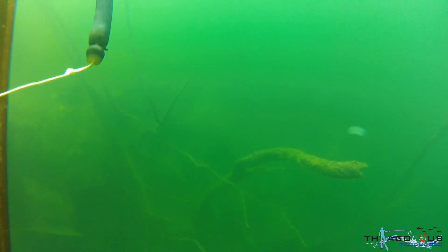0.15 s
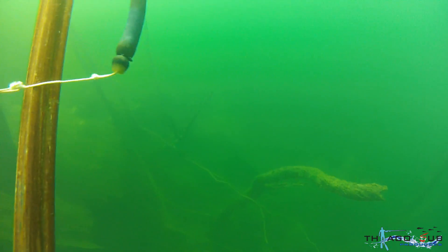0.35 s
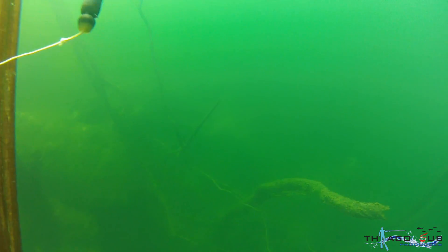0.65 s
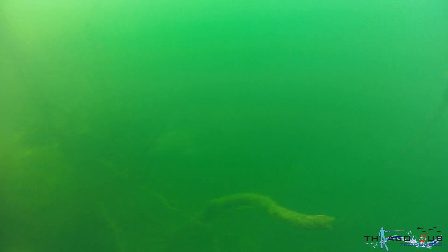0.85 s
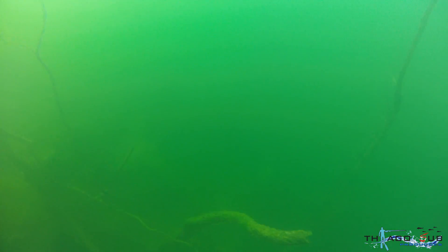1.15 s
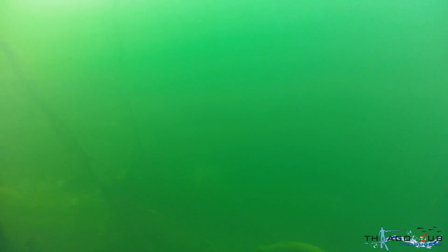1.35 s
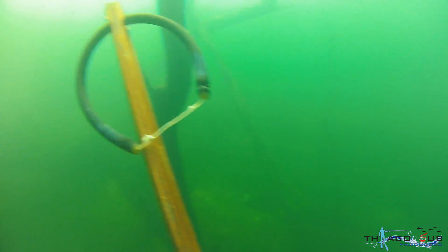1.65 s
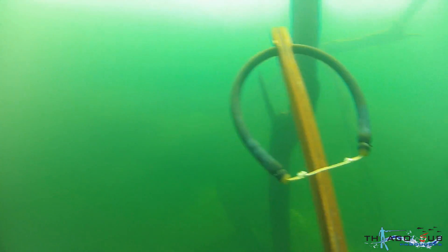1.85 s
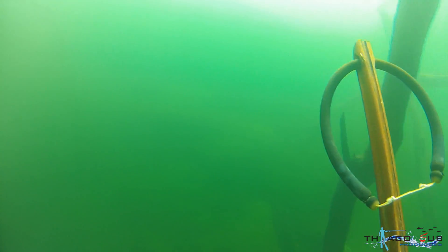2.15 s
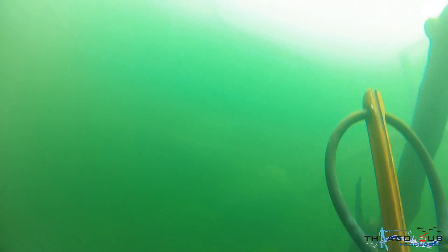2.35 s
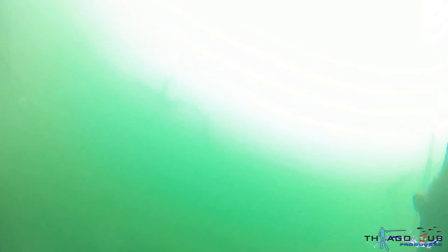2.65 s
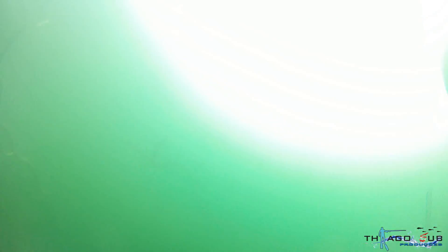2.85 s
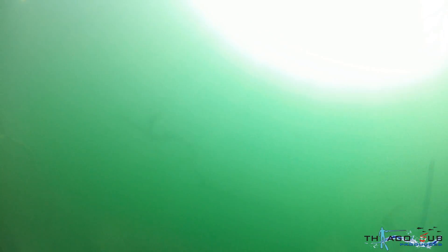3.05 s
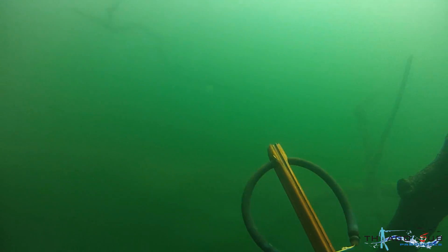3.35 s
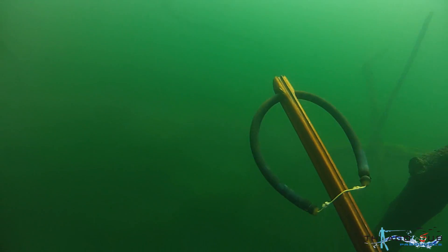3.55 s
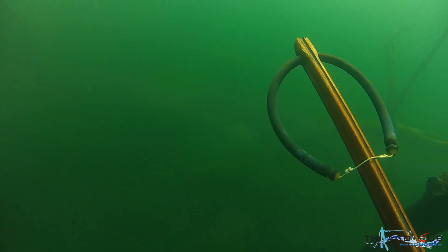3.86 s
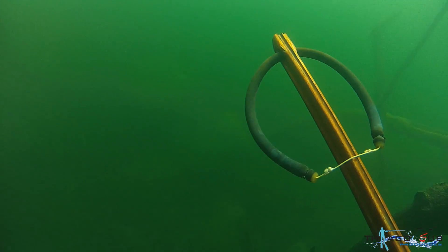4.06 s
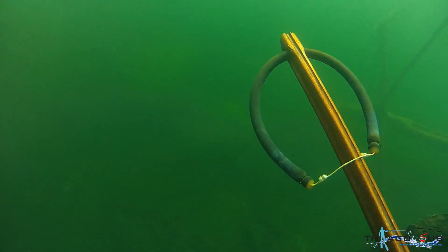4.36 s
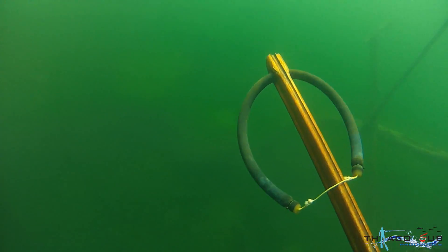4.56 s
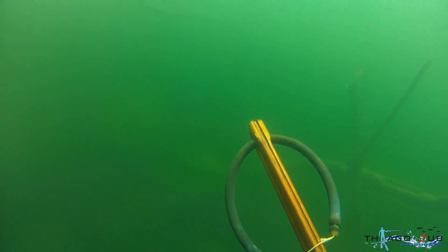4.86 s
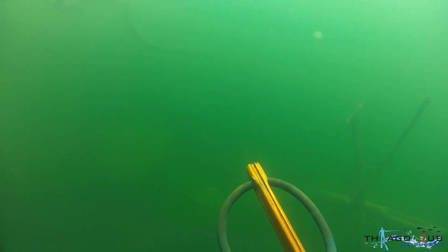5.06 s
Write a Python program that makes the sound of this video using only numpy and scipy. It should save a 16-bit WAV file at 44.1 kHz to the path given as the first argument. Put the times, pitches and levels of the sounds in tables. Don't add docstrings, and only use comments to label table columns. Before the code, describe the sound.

A housed camera moves underwater in low, muffled rumble and gurgle. Quick small gulps come first, with a few pings at half a second. From 1.2 to 1.8 seconds hard, dry snaps hit the shell. Sparse ticks and slow pressure pushes follow, then from about 4 seconds scraping, hollow knocks and bubbly glugs. Very close, dull, nearly mono, with a faint hiss.

```python
import sys
import numpy as np
from scipy import signal
from scipy.fft import rfft, irfft, next_fast_len
from scipy.io import wavfile
from scipy.ndimage import uniform_filter1d, map_coordinates

SR = 44100
rng = np.random.default_rng(int(sys.argv[2]) if len(sys.argv) > 2 else 0)


def log_audio(samples):
    frames = np.atleast_2d(samples).T
    limited = np.clip(frames, -1, 1)
    pcm = np.round(limited * 32767).astype(np.int16)
    wavfile.write(sys.argv[1], SR, pcm)


def ratio(d):
    e = np.asarray(d, float) / 20
    return 10 ** e


N = 230038
TIME = np.arange(N) / SR


def unit(x):
    return x / np.sqrt(np.mean(x ** 2) + 1e-20)


def along(points, hz):
    f, v = np.transpose(points)
    return np.interp(np.log(hz + 1), np.log(f + 1), v)


def level_curve(rows):
    s, db = np.transpose(rows)
    return np.interp(TIME, s, db)


def wobble(rate):
    knots = rng.standard_normal(int(N * rate / SR) + 4)
    return map_coordinates(knots, [np.arange(N) * rate / SR])


def filtered(x, response):
    m = next_fast_len(N + 8192)
    return irfft(rfft(x, m) * response(np.fft.rfftfreq(m, 1 / SR)), m)[..., :N]


def coloured(x, spectrum):
    return filtered(x, lambda hz: ratio(along(spectrum, hz)))


def rush(spectrum):
    return unit(coloured(rng.standard_normal(N), spectrum))


def super_gaussian(x, centre_hz, width_hz):
    return filtered(x, lambda hz: np.exp(-np.abs(2 * (hz - centre_hz) / width_hz) ** 4))


def add(track, s, sound):
    part = track[max(round(s * SR), 0):][:len(sound)]
    part += sound[:len(part)]


def swell(t, t60, rise_ms):
    rise = 1 - np.exp(-(1000 * t / np.abs(rise_ms)) ** 2)
    shape = rise * ratio(-60 * t / np.abs(t60))
    return shape / shape.max()


def window(s, length, edge):
    return np.clip(np.minimum(TIME - s, s + length - TIME) / edge, 0, 1)


# time in seconds, strength in dB.
FLOW_SPEED = [(0.11, -63), (0.29, -57), (0.88, -63), (1.16, -65.5), (1.35, -56), (1.62, -48.5),
              (1.77, -53.5), (2.02, -63), (2.43, -63.5), (2.7, -60), (3.05, -62), (3.22, -52),
              (3.66, -64.5), (4.02, -50.5), (4.2, -52.5), (4.63, -56.5), (4.93, -60), (5.22, -49)]
# frequency in Hz, density in dB per Hz.
RUMBLE_SPECTRUM = [(8.8, -40), (15, -1.5), (51, -3.5), (97, -11), (146, -20), (178, -14.5), (200, -40),
                   (260, -34.5), (440, -120)]
# frequency in Hz, density in dB per Hz.
GURGLE_SPECTRUM = [(71, -1.5), (120, 2), (216, -4), (242, -5.5), (327, -8.5), (388, -10.5), (453, -6.5),
                   (504, -18.5), (650, -25), (840, -69), (1430, -120)]


def flow():
    flow_db = level_curve(FLOW_SPEED)
    usual_flow_db = -62
    rumble_db = -54.5 + 0.17 * (flow_db - usual_flow_db)
    rumble = ratio(rumble_db) * unit(ratio(1.5 * wobble(9)) * rush(RUMBLE_SPECTRUM))
    gurgle = ratio(flow_db + 1.2) * unit(ratio(2.5 * wobble(35)) * rush(GURGLE_SPECTRUM))
    return rumble + gurgle


# time in seconds, peak in dB, rise in ms, choke in ms, thud in dB.
SHELL_SNAPS = [
    (1.2203, -22.5, 0.79, 8.4, -8.5),
    (1.3061, -22.5, 0.98, 4.9, -5),
    (1.3605, -19.5, 1.03, 6, -4.5),
    (1.4249, -19, 0.55, 9.1, -15.5),
    (1.6527, -16.5, 0.67, 8.6, -24),
    (1.732, -26, 1.4, 4.5, -21),
    (1.7717, -23, 1.75, 4.4, -25),
    (3.781, -28, 0.19, 10.5, -9),
]
# frequency in Hz, width in Hz, level in dB.
SHELL_MODES = [
    [(800, 190, -4), (1360, 250, -7), (1510, 200, -13), (2010, 200, -13), (2400, 300, -12.5),
     (2680, 300, -13), (3070, 400, -22), (3650, 166, 7)],
    [(810, 120, 3), (1365, 200, -0.5), (1480, 150, -3), (2000, 170, -9), (2440, 300, -6.5), (2980, 540, -9),
     (3610, 190, 6.5), (3840, 300, -10)],
    [(780, 150, 2), (1380, 250, -1.5), (2030, 140, -7.5), (2450, 290, -7), (2830, 360, -9), (3285, 140, 4),
     (3630, 130, -3)],
    [(764, 130, -3.5), (1436, 780, -1.5), (1900, 74, -2), (2280, 160, 0), (2784, 340, 1), (3564, 170, 1.5)],
    [(900, 260, -30), (1590, 220, 0), (2186, 65, 8.5), (2504, 70, 3.5), (2675, 400, -7.5), (3300, 600, -10),
     (3650, 610, -12.5)],
    [(1150, 110, -20), (2060, 180, -10), (1650, 150, -17), (2480, 200, -14), (3020, 300, -8),
     (3710, 190, 7.5), (4100, 800, -10)],
    [(1170, 76, -11), (1590, 79, -8), (2130, 230, -2), (2420, 180, 0), (2750, 200, -3), (3190, 230, 0.5),
     (3530, 270, 0), (4620, 300, -12), (5040, 300, -11), (5460, 250, -9)],
    [(288, 440, 0), (763, 38, 9), (1190, 25, -4), (1525, 280, -7.5), (2510, 390, -17.5)],
]


def snaps():
    out, t = np.zeros(N), np.arange(SR // 20) / SR
    for (s, db, rise_ms, choke_ms, _), modes in zip(SHELL_SNAPS, SHELL_MODES):
        ring = np.zeros(len(t))
        for k, (hz, width_hz, level_db) in enumerate(modes):
            choke = (1150 * t / choke_ms) ** 3.0 * (hz / 2500) ** 0.8
            fade = np.exp(-1.3 * width_hz * t - choke)
            ring += (-1) ** k * width_hz * ratio(level_db) * fade * np.sin(2 * np.pi * hz * t)
        crack = signal.lfilter([1, 0, -1], [1, -1.2, .5], rng.standard_normal(len(t)))
        ring = ring / np.abs(ring).max() + ratio(-22.5 - 60 * t / 0.0036) * crack
        ring = ring * (1 - np.exp(-(1000 * t / rise_ms) ** 2))
        scatter = ratio(-29 - 60 * t / .021) * np.minimum(t / .004, 1) * rng.standard_normal(len(t))
        scatter[0] = 1
        heard = signal.fftconvolve(ring, scatter)
        add(out, s - rise_ms / 2000, ratio(db) * heard / np.abs(heard).max())
    out = out / (1 + np.abs(out / .13) ** 4) ** .25
    return filtered(out, lambda hz: 1 / np.sqrt(1 + (hz / 5000) ** 16) / np.sqrt(1 + (200 / (hz + 1)) ** 4))


def thuds():
    out, t = np.zeros(N), np.arange(SR // 10) / SR
    for s, db, _, _, thud_db in SHELL_SNAPS:
        add(out, s, ratio(db + thud_db) * swell(t, 0.042, 1.6) * rng.standard_normal(len(t)))
    return super_gaussian(out, centre_hz=1020, width_hz=1000)


# frequency in Hz, level in dB.
DULL_CRACK = [(500, -45), (900, -5), (2300, -2), (3200, -19), (6000, -55)]
# frequency in Hz, level in dB.
BRIGHT_CRACK = [(1500, -22), (3000, -10), (4200, -7.5), (5400, -13.5), (5900, -25)]


def contacts(rows, dull_db):
    rings, dull, bright = np.zeros((3, N))
    t = np.arange(SR // 20) / SR
    sag, sag_s = 0.12, 0.0071
    sagging = t - sag * (t - sag_s * (1 - np.exp(-t / sag_s)))
    for s, db, hz, bright_db, t60 in rows:
        start = s - .0005
        add(rings, start, ratio(db - 6.5) * swell(t, t60, 0.79) * np.sin(2 * np.pi * hz * sagging))
        crack = swell(t, 0.73 * t60, 0.47) * rng.standard_normal(len(t))
        crack[SR // 2000] += 3.5
        add(dull, start, ratio(db + dull_db + 3.0) * crack)
        add(bright, start, ratio(db + bright_db + 0.5) * crack)
    return rings + coloured(dull, DULL_CRACK) + coloured(bright, BRIGHT_CRACK)


# time in seconds, peak in dB, ring in Hz, bright crack in dB.
GEAR_TICKS = [(0.0004, -46.5, 1024, 5.5), (0.259, -55, 2000, 5), (0.281, -53, 2510, -4),
              (0.3187, -54.5, 2000, 3), (0.3533, -50, 2090, -7), (1.1217, -51, 1590, 5),
              (1.476, -57, 2340, 18.5), (1.5683, -53, 3570, 5), (1.587, -45, 2000, 3.5),
              (0.527, -55, 1900, 7.5), (1.922, -55, 1600, -8), (1.937, -54.5, 1940, -8),
              (1.948, -52, 1690, -6), (2.62, -59.5, 2200, 7), (5.042, -58, 3900, -8),
              (5.196, -60, 1300, -2), (2.495, -51.5, 1480, -8), (2.676, -56, 1170, 4),
              (2.796, -61, 4500, 5), (2.817, -58, 3960, 15.5), (2.88, -64, 1800, -8),
              (3.163, -57, 2300, -8), (3.35, -58, 1610, -2), (3.386, -61, 4200, 3), (3.403, -61, 2300, -6),
              (3.001, -53, 1820, 5.5), (3.106, -52, 1080, 8), (3.185, -55.5, 1900, -12),
              (3.227, -57, 3400, -4), (3.273, -60, 2400, 2), (3.283, -66, 2320, -8), (3.299, -56, 990, -10),
              (3.9396, -59, 3750, -2), (3.9565, -52, 1630, 10), (3.9757, -46, 1580, -6),
              (4.485, -51, 1700, -8), (4.54, -48.5, 1200, -12), (4.6565, -56, 1149, -8),
              (4.6725, -59, 2230, -6), (4.281, -54, 2560, -8), (3.255, -47.5, 2000, 0.5),
              (3.257, -47, 1060, -18), (3.499, -60, 1900, -10), (3.373, -51.5, 2300, -4),
              (3.858, -46.5, 1190, -1), (4.8262, -53.5, 1800, 8), (5.03, -52, 1030, -2),
              (5.07, -56, 1070, 3), (5.136, -48, 1000, -5)]
# time in seconds, peak in dB, ring in Hz, bright crack in dB, T60 in seconds.
GEAR_PINGS = [(1.3972, -46.5, 5560, 11, 0.016), (1.4164, -35, 3730, 5, 0.014), (1.4222, -46, 5520, 2, .01),
              (1.8357, -43.5, 1060, -15, 0.027), (2.0313, -36.5, 1900, 2, 0.018),
              (.5385, -40, 1650, -14, 0.034), (1.9695, -51.5, 2060, -16, 0.034),
              (0.5675, -44, 1900, -14, 0.014), (0.5735, -39, 1900, -12, .012), (2.959, -48, 950, -24, .015),
              (1.8347, -55, 2510, -14, .015), (2.9585, -39, 2130, -8, 0.003),
              (4.0971, -38.5, 2000, -25, 0.012), (4.1864, -38.5, 2880, -10, 0.041),
              (4.2612, -43.5, 2480, -14, 0.039), (4.9437, -42.5, 1840, -22, 0.027),
              (4.9796, -36.5, 2980, -5, 0.039)]


def small_parts():
    tick_t60 = .018
    ticks = contacts([row + (tick_t60,) for row in GEAR_TICKS], dull_db=2.5)
    return ticks + contacts(GEAR_PINGS, dull_db=-8)


def resonances(rows, lead, rise_ms, low, high, other_db, climb=0., climb_ms=3.):
    out, t = np.zeros(N), np.arange(SR // 6) / SR
    climbing = t - climb * climb_ms / 1000 * (1 - np.exp(-1000 * t / climb_ms))
    for s, db, hz, t60 in rows:
        first = np.sin(2 * np.pi * hz * climbing)
        other = ratio(other_db) * np.sin(2 * np.pi * hz * rng.uniform(low, high) * climbing)
        add(out, s - lead, ratio(db + 2.5) * swell(t, t60, rise_ms) * (first + other))
    return out


# time in seconds, peak in dB, frequency in Hz.
GAP_GULPS = [(0.027, -60, 380), (0.039, -49, 336), (0.046, -35.5, 352), (0.097, -62, 403), (0.12, -62, 420),
             (0.07, -40, 405), (0.083, -41.5, 355), (0.144, -48, 404), (0.156, -42, 361), (0.178, -53, 364),
             (0.225, -51, 382), (0.254, -50, 375), (0.288, -41.5, 372), (0.303, -44.5, 365),
             (0.358, -49, 350), (0.442, -54, 385), (0.472, -47.5, 370), (0.489, -58.5, 440),
             (0.537, -54, 464), (0.559, -52.5, 454), (0.643, -55.5, 460)]
# time in seconds, peak in dB, frequency in Hz, T60 in seconds.
GAP_HOLLOWS = [(0.001, -49, 212, 0.04), (0.038, -41, 203, 0.08), (0.066, -45, 188, 0.1),
               (0.088, -53, 185, .07), (0.14, -47, 212, 0.12), (0.168, -47.5, 190, 0.081),
               (0.218, -48, 195, 0.096), (0.25, -45, 161, 0.068), (0.29, -48.5, 195, 0.13),
               (0.44, -51.5, 194, 0.12), (0.47, -54, 194, 0.091)]


def gulps():
    gulp_t60 = .058
    gap = resonances([row + (gulp_t60,) for row in GAP_GULPS], 0.00305, 3.6, 0.58, 0.8, other_db=-26)
    return gap + resonances(GAP_HOLLOWS, 0.0035, 5.8, 1.2, 1.3, other_db=-19)


# time in seconds, peak in dB, frequency in Hz.
PRESSURE_PUSHES = [(0.269, -41, 131), (1.973, -43.5, 131.5), (2.788, -47, 164), (2.946, -42, 47.6),
                   (3.201, -39.5, 38.4), (3.269, -43.5, 41.8), (3.291, -38.5, 43), (3.89, -36, 92),
                   (3.983, -34.5, 63), (4.018, -34.5, 31), (4.1, -39.5, 52), (4.484, -46, 139),
                   (4.92, -45.5, 105)]


def pushes():
    cycles = 4.6
    rows = [(s, db, hz, cycles / hz) for s, db, hz in PRESSURE_PUSHES]
    return resonances(rows, 0.0026, 4.0, 1.58, 2.7, other_db=-12.0)


# time in seconds, peak in dB, frequency in Hz, T60 in seconds.
POCKET_KNOCKS = [(1.064, -54, 303, 0.081), (3.608, -48.5, 253, 0.018), (4.1865, -36.5, 620, 0.027),
                 (4.1905, -35.5, 385, 0.023), (4.2403, -39, 507, 0.0055), (4.259, -46, 350, 0.017),
                 (4.28, -34, 350, 0.025), (4.291, -40, 435, 0.02), (4.32, -38.5, 367, 0.035),
                 (4.386, -35.5, 334, 0.025), (4.449, -45, 386, 0.021), (4.5405, -29.5, 364, 0.026),
                 (4.656, -39.5, 360, 0.022), (4.784, -44.5, 220, 0.019), (4.862, -50.5, 300, .03),
                 (3.986, -47, 330, 0.026), (3.998, -43.5, 377, 0.014), (3.12, -57, 496, 0.017),
                 (3.145, -57, 450, 0.021), (4.506, -55, 545, 0.013), (4.52, -50, 520, 0.013),
                 (4.58, -50, 332, .02), (4.622, -47.5, 278, 0.02), (4.7, -58.5, 500, 0.017),
                 (1.886, -56, 376, 0.024), (4.548, -41.5, 340, 0.037), (4.924, -45, 255, 0.029),
                 (4.965, -59, 323, 0.036), (5.097, -52, 396, 0.016), (5.147, -47, 200, 0.031)]
# time in seconds, peak in dB, frequency in Hz, T60 in seconds.
POCKET_GLUGS = [(0.001, -39, 450, 0.019), (1.9755, -50, 330, 0.026), (3.502, -44, 365, 0.023),
                (3.526, -44, 363, 0.013), (3.578, -47, 450, 0.011), (4.0978, -25.5, 305, 0.008),
                (4.881, -43.5, 327, 0.055), (4.944, -44.5, 317, 0.073), (4.979, -44, 308, 0.08),
                (5.015, -42, 339, 0.077), (5.064, -49, 288, 0.04), (5.1178, -26.5, 367, 0.017),
                (5.139, -35, 306, 0.032), (5.157, -37, 333, 0.018), (5.193, -40, 334, 0.11),
                (5.2075, -31, 367, 0.032)]


def pockets():
    held = resonances(POCKET_KNOCKS, 0.00089, 1.63, 1.424, 1.75, other_db=-4.5, climb=0.26, climb_ms=2.17)
    free = resonances(POCKET_GLUGS, 0.00086, 1.48, 1.7, 1.7, other_db=-17.0, climb=0.059, climb_ms=3.1)
    return held - free


# time in seconds, peak in dB, frequency in Hz, T60 in seconds.
SMALL_BUBBLES = [(0.082, -56.5, 755, 0.028), (4.192, -34, 790, 0.078), (4.241, -34, 940, 0.042),
                 (4.259, -44, 934, 0.057), (4.386, -40.5, 790, 0.018), (4.877, -55, 840, 0.035),
                 (4.886, -53.5, 900, 0.032), (4.438, -52, 714, .02), (4.462, -57, 734, 0.021),
                 (4.578, -50.5, 855, .03), (1.903, -56, 796, 0.038), (4.967, -51, 795, 0.018),
                 (5.038, -50, 764, 0.039), (5.072, -59, 850, 0.12), (0.28, -64.5, 785, 0.076),
                 (4.9255, -48, 890, 0.04), (4.944, -42.5, 800, 0.024), (4.98, -39, 764, 0.027),
                 (5.001, -49.5, 817, 0.078), (5.028, -49, 760, 0.046), (5.14, -53.5, 1014, 0.055),
                 (5.198, -47.5, 1010, 0.035)]


def bubbles():
    return resonances(SMALL_BUBBLES, 0.00084, 0.91, 1.1, 1.2, other_db=-17.0, climb=0.24, climb_ms=1.95)


# time in seconds, strength in dB.
STRAP_LOAD = [(0.0, -76.5), (0.54, -74.5), (0.93, -78), (1.2, -76), (1.55, -69.5), (1.96, -75.5),
              (2.85, -76.5), (3.21, -72), (3.62, -75), (3.86, -78), (4.0, -57), (4.11, -65.5),
              (4.39, -60.5), (4.5, -87), (4.62, -68), (4.69, -82), (5.08, -88), (5.22, -81)]
# frequency in Hz, density in dB per Hz.
SCRAPE_SPECTRUM = [(590, -17), (1000, -9), (1200, -8), (1610, -1.5), (1970, -4.5), (2130, -2), (2780, -8.5),
                   (3600, -6.5), (4320, -17), (4930, -12.5), (5800, -22), (7540, -71), (12800, -120)]
# frequency in Hz, density in dB per Hz.
GROAN_SPECTRUM = [(320, -74), (550, -31), (617, -12), (714, -4), (852, -5.5), (1200, -22), (1560, -44),
                  (2640, -120)]
# start in seconds, length in seconds, first level in dB,
# last level in dB, brightness in dB per octave.
GLOVE_STROKES = [
    (3.961, 0.14, -50, -68, -3.5),
    (4.093, 0.11, -56, -57.5, -4.5),
    (4.204, 0.15, -61, -75, -9),
    (4.281, 0.11, -62, -56.5, -7),
    (4.477, 0.12, -62, -69, -6),
    (4.539, 0.089, -57, -56, -5),
    (4.658, 0.069, -65, -64, -4.5),
    (4.796, 0.073, -67, -66.5, -4.5),
]
# start in seconds, length in seconds, level in dB,
# centre in Hz, width in Hz.
STRAP_SCUFFS = [(0.543, 0.029, -58, 1840, 1100), (2.65, 0.052, -62.5, 450, 200), (1.6, .1, -61.5, 454, 120),
                (1.73, 0.045, -60.5, 440, 150), (2.3, .03, -52, 120, 80), (.575, .06, -63.5, 436, 210),
                (2.497, .012, -68.5, 1500, 500), (0.58, 0.043, -77, 3650, 1200),
                (4.952, 0.032, -75, 1930, 250), (5.144, 0.014, -70.5, 2700, 500),
                (2.07, 0.018, -63, 1620, 600), (3.968, 0.035, -58, 1500, 450), (4.04, 0.04, -65, 1430, 450),
                (4.115, 0.068, -63, 2050, 450), (4.33, .045, -60, 1530, 580), (4.45, 0.033, -75, 1450, 410),
                (3.589, 0.012, -69, 2300, 1000), (5.1, 0.024, -68.5, 1340, 260),
                (4.595, .018, -63, 1580, 260), (3.13, .17, -77, 1300, 1400),
                (1.133, 0.028, -62, 1830, 1100), (1.249, 0.073, -66, 1830, 970),
                (1.6, 0.031, -77, 1900, 860), (3.59, 0.012, -54, 4210, 2350),
                (3.813, 0.045, -73.5, 2900, 2000), (0.26, 0.026, -67, 2170, 1100),
                (0.34, 0.017, -67.5, 2200, 1000), (1.33, 0.19, -72, 880, 570), (1.46, 0.24, -58, 380, 230),
                (5.19, 0.028, -57, 1080, 1100), (4.432, 0.18, -66, 730, 250), (4.5, 0.46, -74, 870, 360)]


def rub():
    scrape_db = level_curve(STRAP_LOAD)
    groan_db = scrape_db + 0.1
    grain = ratio(2 * wobble(260) + 1.2 * wobble(45))
    out = ratio(scrape_db - 3) * unit(grain * rush(SCRAPE_SPECTRUM))
    out += ratio(groan_db - 3) * unit(ratio(3.5 * wobble(50)) * rush(GROAN_SPECTRUM))
    for s, length, first_db, last_db, tilt_db in GLOVE_STROKES:
        colour = [(hz, db + tilt_db * np.log2(hz / 2000)) for hz, db in SCRAPE_SPECTRUM]
        level = ratio(np.interp(TIME, [s, s + length], [first_db, last_db]))
        out += level * window(s, length, .012) * unit(grain * rush(colour))
    slips_per_s, slip_db = 85, 8
    for s, length, db, hz, width_hz in STRAP_SCUFFS:
        band = super_gaussian(rng.standard_normal(N), hz, width_hz)
        slips = ratio(-slip_db * (slips_per_s * (TIME - s) % 1) + 1.4 * wobble(170))
        stroke = slips * window(s, length, .004) * band
        out += ratio(db) * np.sqrt(length * SR / N) * unit(stroke)
    return out


def crackle(count):
    when, size = rng.uniform(size=(count, 2)).T
    at = (when * (N - 1)).astype(int)
    load_db = np.minimum(level_curve(STRAP_LOAD)[at], -66)
    sparks = np.bincount(at, ratio(load_db + 22.0 + 15.0 * size), N)
    t = np.arange(SR // 100) / SR
    burst = ratio(-60 * t / 0.027) * rng.standard_normal(len(t))
    grit = signal.fftconvolve(sparks, burst)[:N] / 4
    return filtered(grit, lambda hz: ratio(along(DULL_CRACK, hz / 1.13)))


# frequency in Hz, density in dB per Hz.
HISS_SPECTRUM = [(120, -34), (200, 1.5), (358, -2), (413, -6.5), (632, -9), (927, -13.5), (2140, -18),
                 (4290, -21.5), (5160, -23.5), (5950, -35), (7740, -67), (13100, -120)]


def hiss():
    return ratio(-65.5) * rush(HISS_SPECTRUM)


# frequency in Hz, density in dB per Hz.
CAPSULE_SPECTRUM = [(18, -35), (30, -4), (87, 7.5), (274, 7), (830, -4), (4660, -4.5), (5450, -8.5),
                    (5950, -16), (7740, -53), (13100, -120)]


def capsule_noise():
    return ratio(-79.5) * rush(CAPSULE_SPECTRUM)


def scene():
    gear = snaps() + thuds() + small_parts()
    air = gulps() + pushes() + pockets() + bubbles()
    mid = flow() + gear + air + rub() + crackle(count=260) + hiss()
    side = capsule_noise()
    return np.array([mid + side, mid - side])


def thinned(x, from_hz, gate_db):
    hz, _, z = signal.stft(x, SR, nperseg=2048)
    power = uniform_filter1d(np.abs(z.mean(0)) ** 2, size=9, axis=0)
    usual = np.median(power[(hz > from_hz) & (hz < 15000)])
    keep = (hz[:, None] < from_hz) | (power > usual * ratio(2 * gate_db))
    return signal.istft(z * keep, SR, nperseg=2048)[1][:, :N]


def band_limit(x):
    return signal.sosfilt(signal.butter(12, 16590, fs=SR, output="sos"), x)


# frequency in Hz, level in dB.
BAND_LIMIT = [(8, -32), (18, -2.5), (14600, 0.5), (15100, 3), (15400, -12), (16000, -30), (16500, -35),
              (16700, -92)]


def record(dry):
    hold_hz = 12000
    band = filtered(dry, lambda hz: (hz < hold_hz / 2) / np.sinc(np.minimum(hz / hold_hz, .5)))
    sampled = band * (1 + 2 * np.cos(2 * np.pi * hold_hz * TIME))
    held = filtered(sampled, lambda hz: np.sinc(hz / hold_hz) * ratio(along(BAND_LIMIT, hz)))
    mix = thinned(held, 12900, gate_db=-1.9)
    return band_limit(mix)


dry = scene()
out = record(dry)
log_audio(out)
```